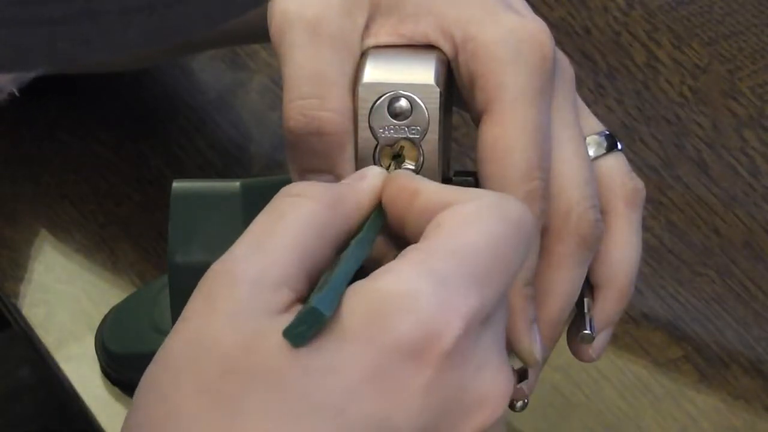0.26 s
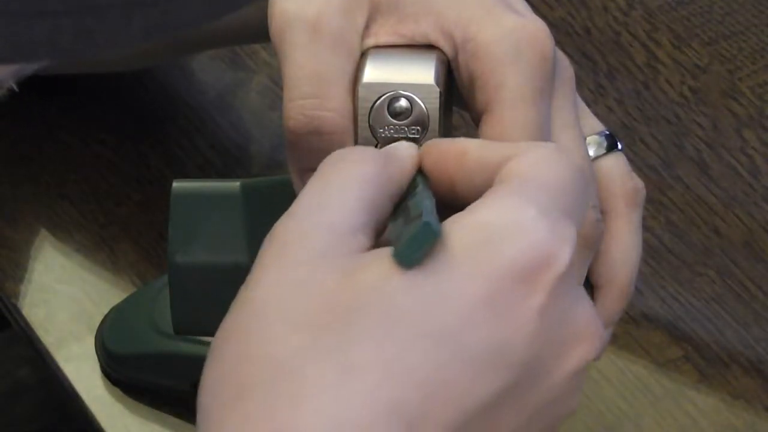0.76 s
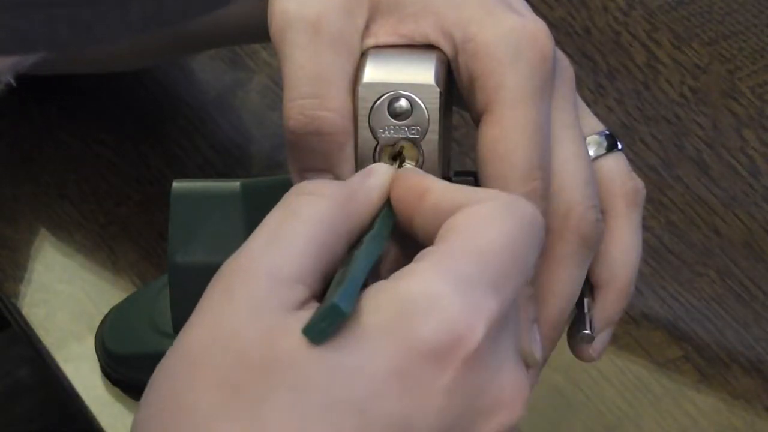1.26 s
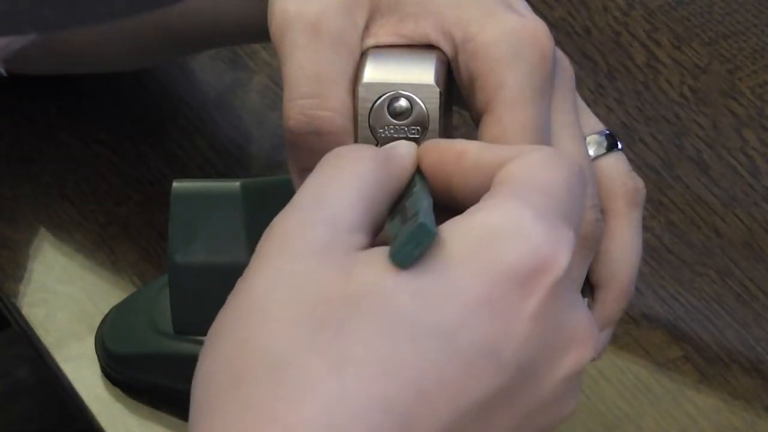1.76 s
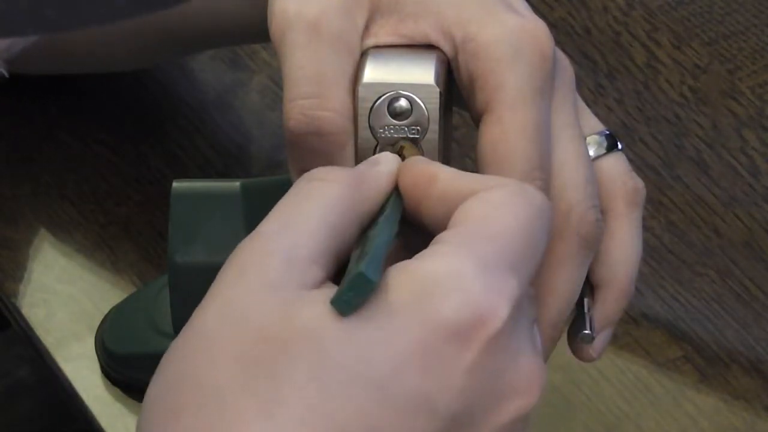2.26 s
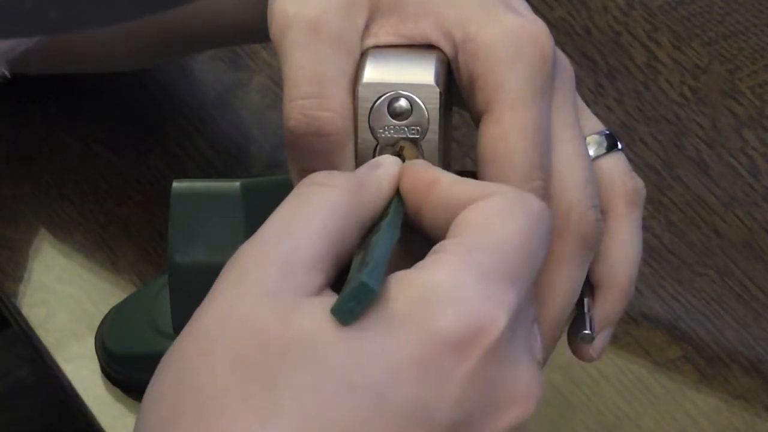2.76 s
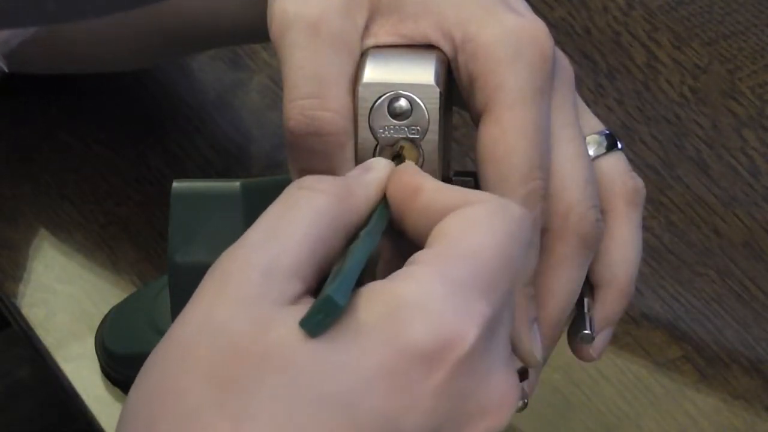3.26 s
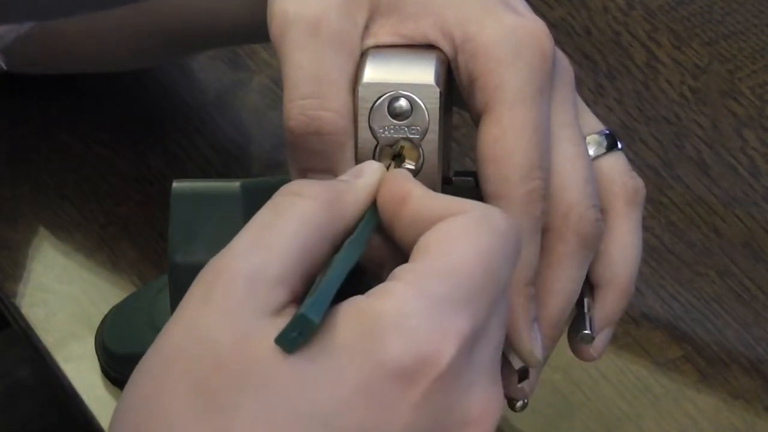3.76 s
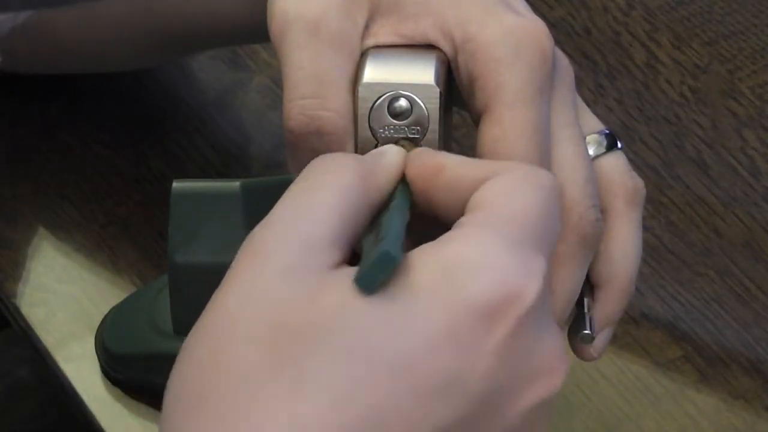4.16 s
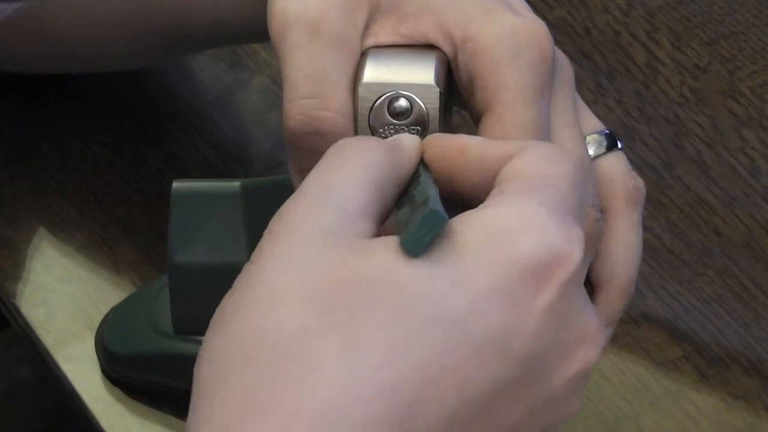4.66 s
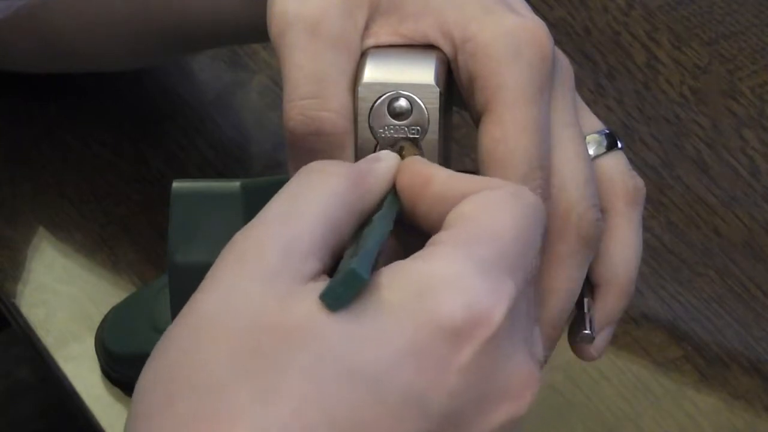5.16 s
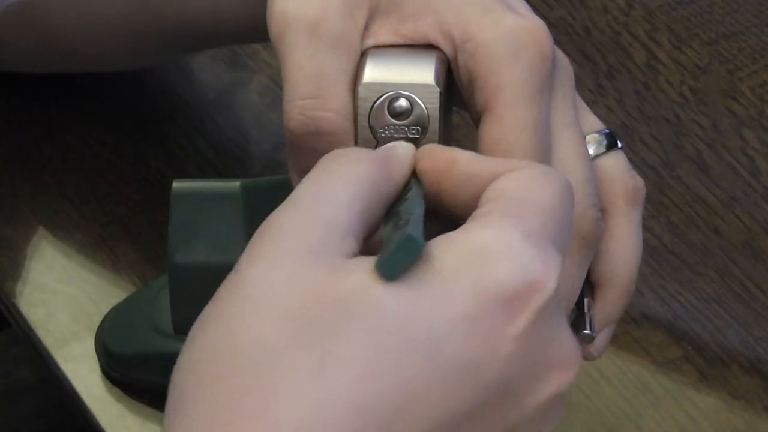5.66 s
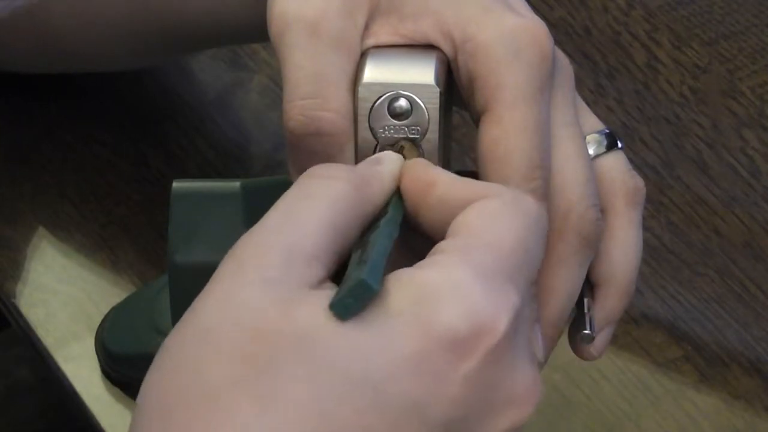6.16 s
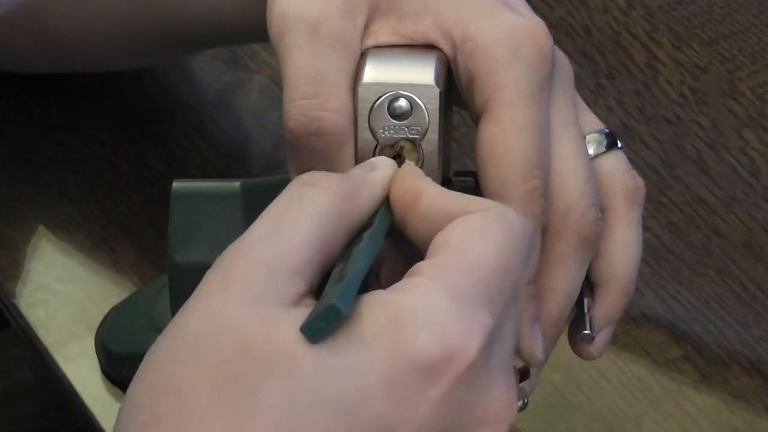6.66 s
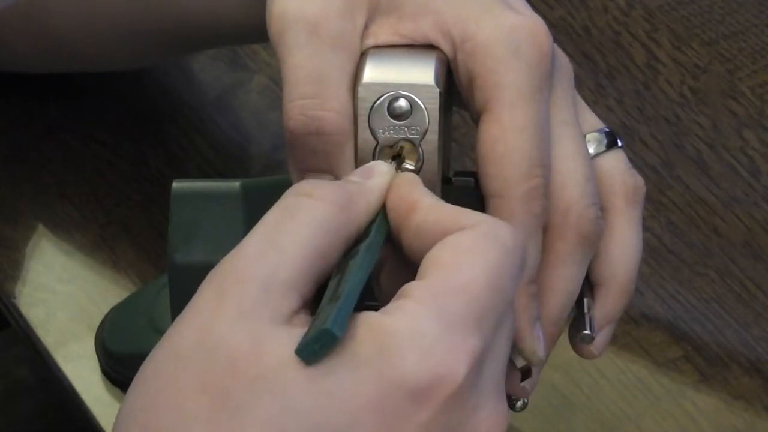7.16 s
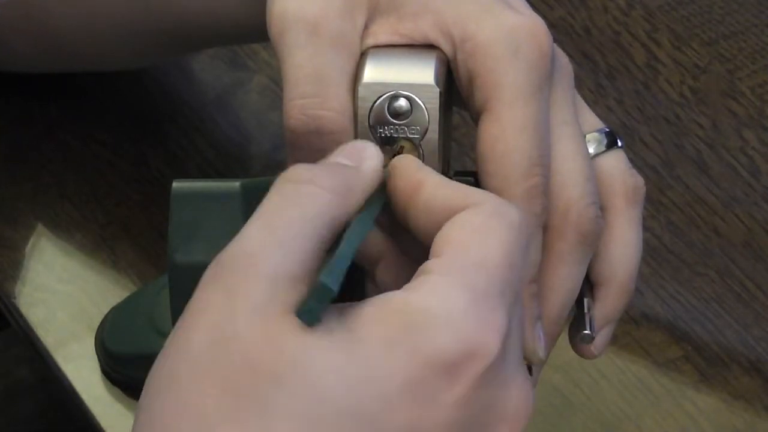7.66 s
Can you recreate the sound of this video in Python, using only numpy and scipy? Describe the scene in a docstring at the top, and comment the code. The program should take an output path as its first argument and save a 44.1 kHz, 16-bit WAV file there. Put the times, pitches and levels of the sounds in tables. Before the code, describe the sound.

In a quiet indoor room, faint metallic touches lead to a crisp double click just after two seconds, then a stronger snap near three. More light ticks follow, with hard clicks just after five and at six, then almost nothing but two faint late ticks. Harder slips thud softly in the table. Close microphones add gentle hiss above low air rumble.

```python
"""A steel pick works the pins of a padlock held in a small vice on a table, in a quiet room.
Pins and pick tick brightly: short forces set the many tones of the lock ringing.
The harder slips also knock the vice and the table top, and noise echoes make the room.
An appliance hums as wavering sines, sparse clicks crackle faintly through one ringing tone,
and shaped noise makes the rumbling air and the hiss of a close pair of microphones."""
import sys
import numpy as np
from scipy import signal
from scipy.fft import rfft, irfft
from scipy.io import wavfile

SR = 44100
rng = np.random.default_rng(int(sys.argv[2]) if len(sys.argv) > 2 else 0)


def bounce(signal):
    """Save signal as a 16-bit WAV file at the path given by the first command-line argument."""
    frames = np.transpose(np.atleast_2d(signal))
    limited = np.clip(frames, -1, 1)
    pcm = np.round(limited * 32767).astype(np.int16)
    wavfile.write(sys.argv[1], SR, pcm)


N = 349272   # length of the scene in samples


def from_db(db):
    """Turns a level in dB into a factor to multiply by."""
    return 10 ** (np.asarray(db) / 20)


def rms_one(x):
    """Scales a sound to an average power of 1."""
    return x / np.sqrt(np.mean(x ** 2))


def at_hz(points, hz):
    """Reads a curve of (f/Hz, value) points, with straight lines over log frequency."""
    points = np.array(points)
    return np.interp(np.log(hz), np.log(points[:, 0]), points[:, 1])


def drift(rate):
    """A slow random curve of spread about 1; a higher rate makes it wander faster."""
    steps_per_s = 40
    steps = rng.standard_normal(round(N / SR * steps_per_s) + 2)
    slow = signal.lfilter([1], [1, -np.exp(-rate / 6)], steps)   # each step remembers the last ones
    return np.interp(np.arange(N) / SR * steps_per_s, np.arange(len(slow)), rms_one(slow))


def ring(force, hz, t60):
    """One mode (a tone a body rings at): a unit click starts a sine that falls 60 dB in t60 seconds."""
    keep = from_db(-60 / (t60 * SR))   # what is left after one sample
    turn = 2 * np.pi * hz / SR
    return signal.lfilter([0, np.sin(turn)], [1, -2 * keep * np.cos(turn), keep * keep], force)


def nearness_db(hz, centre_hz, spread, floor_db):
    """Modes far from the pitch of a contact are driven less, but never below the floor."""
    octaves = np.log2(hz / centre_hz)
    return max(-6 * (octaves / spread) ** 2, floor_db)


def add(track, sound, s):
    """Mixes a sound in at its time in seconds."""
    at = round(s * SR)
    track[..., at:at + sound.shape[-1]] += sound[..., :N - at]


def coloured(spectrum, peaks=()):
    """Stereo noise of power 1 with optional resonances, alike in both ears mainly for the long waves."""
    # how alike left and right are: (f/Hz, likeness from 0 to 1)
    likeness = [(60, 0.86), (290, 0.81), (640, 0.5), (1400, 0.4), (2200, 0.074), (3500, 0.078)]
    hz = np.fft.rfftfreq(N, 1 / SR) + 1   # 1 Hz up, so that the logarithm exists
    db = at_hz(spectrum, hz)
    for centre, width, change_db in peaks:
        db = db + change_db / (1 + (2 * (hz - centre) / width) ** 2)
    mid, side = rfft(rng.standard_normal((2, N))) * from_db(db)
    alike = np.clip(at_hz(likeness, hz), 0, 1)
    opposite = side * np.array([[1], [-1]])
    return rms_one(irfft(np.sqrt(1 + alike) * mid + np.sqrt(1 - alike) * opposite, N))


def hum():
    """An appliance gives steady tones that waver a little in level and pitch."""
    # tones of the appliance: (f/Hz, rms level/dB)
    tones = [(48.4, -71), (91.5, -66.5), (484, -73.5), (565.2, -62), (748.3, -73.5), (969, -72.5)]
    t = np.arange(N) / SR
    out = np.zeros(N)
    for hz, db in tones:
        level = np.sqrt(2) * from_db(db + 1.37 * drift(9.0))   # root 2 turns rms into height
        phase = 0.17 * drift(1.73) + rng.uniform(0, 7.9)
        out += level * np.sin(2 * np.pi * hz * t + phase)
    return out


def rumble():
    """The air rumbles as low noise, mostly louder, at 120 Hz softer, where standing waves fit the room."""
    # shape of the rumble: (f/Hz, relative level/dB per Hz)
    air_shape = [(20, -11.5), (50, -14), (130, -2.5), (230, -10.5), (380, -10), (410, -11.5), (700, -11),
                 (1150, -14), (1230, -15.5), (2050, -19), (2400, -28), (3500, -31), (6000, -62)]
    # standing waves: (f/Hz, width/Hz, level change/dB)
    standing_waves = [(120, 6.5, -2.5), (190.6, 12, 5), (271, 11, 6), (322, 12.6, 7), (364.7, 26.5, 10),
                      (518, 17, 4.5), (532, 22, 3), (641, 21.4, 3), (873, 20, 4.5), (1094, 27, 6.5)]
    return from_db(-53 + 0.11 * drift(5.0)) * coloured(air_shape, standing_waves)


def crackle():
    """Random clicks, denser at some times than at others, each ring one short narrow tone."""
    clicks_per_s, tone_hz, t60_s, level_db = 43, 3670, 0.015, -67.5
    chance = clicks_per_s * from_db(7 * drift(2.5)) / SR   # the slow swing makes clumps
    born = rng.random(N) < chance
    clicks = born * rng.standard_normal(N) + 1e-18   # the tiny offset keeps numbers from fading to nothing
    return from_db(level_db) * ring(clicks, tone_hz, t60_s)


def hiss():
    """Microphone hiss is bright noise that stops steeply at the top."""
    # shape of the hiss: (f/Hz, relative level/dB per Hz)
    hiss_shape = [(20, -31), (2000, -27), (3000, -17.5), (3700, 2), (5300, 2), (8000, -1.5), (10000, -0.5),
                  (13000, -4), (15700, -5)]
    top_hz, level_db = 15750, -65
    steep = signal.ellip(10, .5, 50, top_hz, fs=SR, output="sos")
    return from_db(level_db) * signal.sosfilt(steep, coloured(hiss_shape))


def struck_lock(force, hz, spread, floor_db):
    """All lock modes ring under one force, neighbours in opposite sign; scaled to height 1."""
    # modes of the lock: (f/Hz, relative level/dB, time to fall 60 dB/s)
    lock_modes = [(2920, -16, 0.0065), (3680, -6, 0.0027), (4500, -3.5, 0.0033), (5120, -6, 0.0054),
                  (6170, -8.5, 0.0048), (7050, -7.5, 0.006), (7940, -3, .003), (9240, -2, 0.0029),
                  (9970, 3, 0.0028), (10300, 3, 0.0035), (11420, -0.5, 0.0033), (13100, -4.5, 0.004),
                  (14400, 1, 0.0014), (15200, -10, 0.0047), (17500, -8, 0.0016)]
    sound = np.zeros(len(force))
    for k, (mode_hz, db, t60) in enumerate(lock_modes):
        gain = from_db(db + nearness_db(mode_hz, hz, spread, floor_db))
        sound += (-1) ** k * gain * ring(force, mode_hz, t60)
    return sound / np.abs(sound).max()


def ticks():
    """A contact, its rebound and a dying chatter strike the lock; returns direct sound and wall share."""
    # metal contacts in the keyway: (t/s, level/dB, main f/Hz, spread/octaves,
    # rebound level against the contact/dB, second pitch that lingers in the echo, mostly lower f/Hz)
    contacts = [(.177, -38, 10200, .44, -16, 8000), (.545, -46.5, 4330, .34, -12, 4500),
                (0.7123, -43, 6030, 1.3, -9, 5000), (1.226, -45.5, 8400, .55, -12, 7000),
                (1.267, -44.5, 10200, .54, -12, 8000), (1.4465, -52, 5400, .65, -12, 5000),
                (1.732, -48, 7800, 0.37, -14, 7000), (2.195, -28.5, 11500, 0.7, 1.5, 7300),
                (2.268, -14.5, 11140, 0.44, -8, 7000), (2.884, -51, 7750, 0.6, -12, 7000),
                (2.9649, -9.5, 10900, 0.54, -2.5, 7340), (3.8178, -35, 8500, 1.3, -2.5, 6500),
                (3.829, -38, 7500, .88, -9, 5000), (3.837, -45, 10200, .35, -12, 7000),
                (4.1907, -33, 8100, 0.59, -15, 6000), (4.818, -44, 9500, 0.3, -10, 9500),
                (4.8427, -34.5, 10000, 0.14, -1, 10000), (5.2291, -15, 11000, 0.29, -4, 6500),
                (5.5908, -27.5, 10000, 0.95, -6, 6060), (5.6072, -41, 10000, .39, -9, 9500),
                (5.616, -51, 11000, .45, -12, 9000), (5.659, -56, 5000, .45, -12, 5000),
                (5.676, -52, 4500, .42, -9, 4500), (5.8617, -47, 11100, .45, -12, 9000),
                (6.040, -15.5, 10300, 0.35, -2, 6100), (7.379, -42, 9400, 0.75, -6, 7500),
                (7.73, -43, 9450, .7, -13, 8000), (7.747, -47.5, 9050, .55, -12, 8000)]
    rebound_s, chatter_s, chatter_db = .0022, 0.00074, -11
    echo_spread, echo_reach_db = .28, -11   # octaves, dB
    near, far, t = np.zeros(N), np.zeros(N), np.arange(1000) / SR
    for s, peak_db, hz, spread, rebound_db, echo_hz in contacts:
        # cubing the noise makes a few grains stand out; a sharp unit click comes first
        grains = rng.standard_normal((2, len(t))) ** 3
        force = grains * from_db(chatter_db) * np.exp(-t / chatter_s)
        force[:, 0] = 1
        # a hard blow also drives the far modes, a light touch mainly the near ones
        reach_db = -7.5 + 0.22 * peak_db
        contact = struck_lock(force[0], hz, spread, reach_db)
        rebound = struck_lock(force[1], hz, spread, reach_db)
        add(near, from_db(peak_db) * contact, s)
        add(near, from_db(peak_db + rebound_db) * rebound, s + rebound_s)
        # the high modes beam forward, so the walls also get a second, mostly lower pitch
        click = 1.0 * (t == 0)
        second = struck_lock(click, echo_hz, echo_spread, echo_reach_db)
        own = from_db(-2) * struck_lock(click, hz, echo_spread, echo_reach_db)
        echo_db = -12 - 0.14 * peak_db   # the lighter the touch, the larger the share for the walls
        add(far, from_db(peak_db + echo_db) * (second + own), s)
    return near, far


def knocks():
    """The vice answers at once; the table takes a longer, rough push and swells later; legs sway last."""
    # knocks passed on: (t/s, vice level/dB, vice f/Hz, table level/dB, table f/Hz, leg sway level/dB)
    slips = [(.712, -44, 1020, -51, 580, -54), (0.811, -51.5, 1250, -51.5, 580, -45),
             (2.268, -33, 780, -37.5, 560, -45), (2.965, -32.5, 1240, -42.5, 313, -53),
             (3.818, -43, 1300, -46.5, 400, -60), (3.826, -39, 780, -48, 330, -56),
             (5.229, -30, 1210, -39, 393, -50), (5.591, -37.5, 1160, -39.5, 150, -35.5),
             (5.862, -46, 900, -43, 225, -45), (6.039, -33, 1140, -35.5, 365, -42)]
    # modes of the vice, the table and its legs: (f/Hz, relative level/dB, time to fall 60 dB/s)
    vice_modes = [(766, 2, 0.11), (904, -7.5, 0.084), (1057, -14, 0.057), (1174, -11, 0.025),
                  (1345, 5.5, 0.0083), (1383, -10.5, 0.027), (1561, -8, 0.06), (1778, -11.5, 0.2),
                  (1903, -8, 0.044)]
    table_modes = [(145, -2, 0.44), (172.7, 5, 0.12), (205, 6, 0.24), (285, 2.5, 0.46), (337.8, -0.5, 0.21),
                   (384.5, -5.5, 0.15), (247, -5.5, 0.22), (457, -5.5, 0.26), (494, -9, 0.074),
                   (660, -6, 0.076), (536.4, -1, 0.13), (608, 3.5, 0.094)]
    sway_modes = [(51.8, -5, 0.28)]
    out, t = np.zeros(N), np.arange(SR // 2) / SR
    for s, vice_db, vice_hz, table_db, table_hz, sway_db in slips:
        # modes, level in dB, time to the height of the push in s, pitch in Hz, spread in octaves
        bodies = ((vice_modes, vice_db, 0.0009, vice_hz, .6),
                  (table_modes, table_db, 0.0048, table_hz, .7),
                  (sway_modes, sway_db, .018, 50, 1))
        for modes, level_db, push_s, centre_hz, spread in bodies:
            for hz, db, t60 in modes:
                push = rng.standard_normal(len(t)) * t * np.exp(-t / push_s)
                sound = ring(push, hz, t60)
                gain = from_db(level_db + db + nearness_db(hz, centre_hz, spread, -10.5))
                add(out, gain * sound / np.abs(sound).max(), s)
    return out


def room(x, alike):
    """Wall echoes build up into a dense dying wash, partly different in each ear."""
    t60_s, build_up_s = 0.24, 0.0011
    apart_hz, apart_db = 10000, 2.5   # above this pitch the ears differ more
    wall_cut_hz = 11500
    t = np.arange(SR // 2) / SR
    rise = np.clip(t / build_up_s, 0, 1) ** 2
    mid, side = rng.standard_normal((2, len(t))) * rise * from_db(-60 * t / t60_s)
    treble = signal.butter(2, apart_hz, "high", fs=SR, output="sos")
    side = side + from_db(apart_db) * signal.sosfilt(treble, side)
    opposite = side * np.array([[1], [-1]])
    echoes = np.sqrt(alike) * mid + np.sqrt(1 - alike) * opposite
    soft_walls = signal.butter(2, wall_cut_hz, fs=SR, output="sos")   # they swallow the top
    echoes = signal.sosfilt(soft_walls, echoes) / np.sqrt(np.sum(mid ** 2))
    return signal.fftconvolve(x[None], echoes, axes=1)[:, :N]


def inlets(x):
    """The sound inlet of each microphone loses its own band of treble."""
    # dips of the left and right inlet: (f/Hz, width/Hz, level/dB)
    dips = [(11600, 2600, -8), (14200, 2200, -9)]
    out = []
    for channel, (hz, width, db) in zip(x, dips):
        b, a = signal.iirpeak(hz, hz / width, fs=SR)
        out.append(channel + (from_db(db) - 1) * signal.lfilter(b, a, channel))
    return np.array(out)


def scene():
    """Lock, vice and table close by, the room behind, and the hiss that bypasses the inlets."""
    background = rumble() + hum() + crackle()
    metal, to_walls = ticks()
    wood = knocks()
    wash = room(to_walls, alike=0.76) + from_db(-2.5) * room(wood, alike=0.99)
    sound = inlets(metal + wash + wood + background) + hiss()
    return from_db([[-.4], [.4]]) * sound   # left a little down, right a little up


def record(dry):
    """The microphones are dull in one band of the upper middle; the top is cut steeply."""
    low_hz, high_hz, dip_db, cutoff_hz = 2224 * 1.045, 3640 / 1.115, -3, 16900
    for hz in np.geomspace(low_hz, high_hz, num=3):   # three neighbouring cuts make one wide dip
        b, a = signal.iirpeak(hz, 4.0, fs=SR)
        dry = dry + (from_db(dip_db) - 1) * signal.lfilter(b, a, dry)
    return signal.sosfilt(signal.cheby2(16, 70, cutoff_hz, fs=SR, output="sos"), dry)


dry = scene()
out = record(dry)
bounce(out)
```